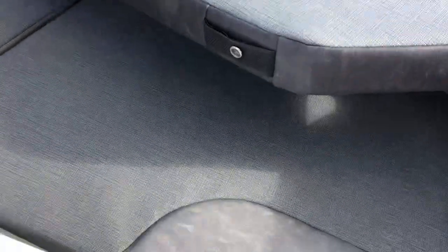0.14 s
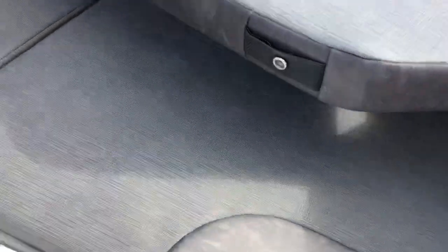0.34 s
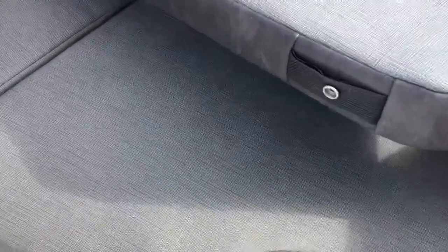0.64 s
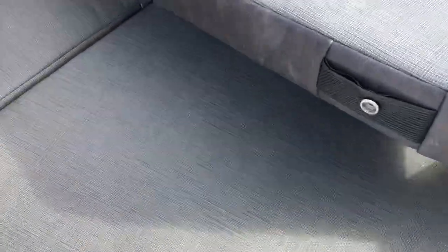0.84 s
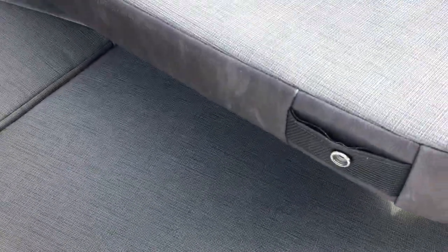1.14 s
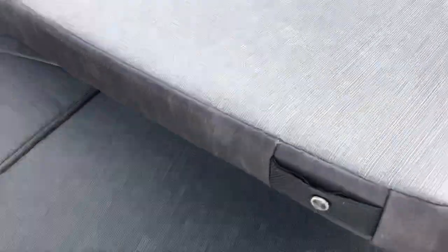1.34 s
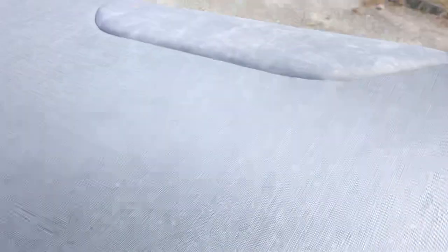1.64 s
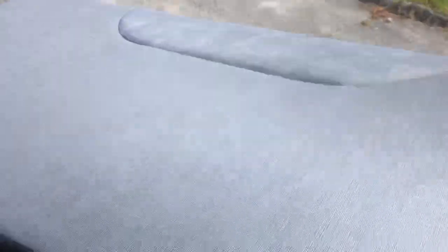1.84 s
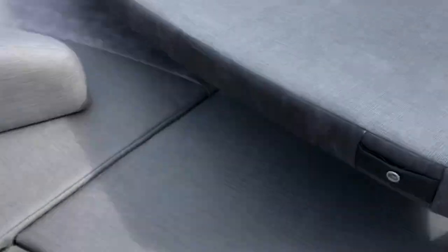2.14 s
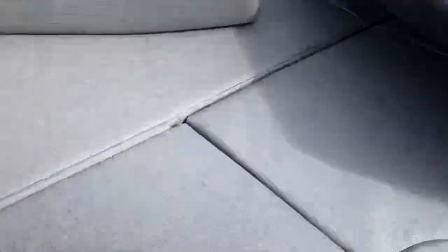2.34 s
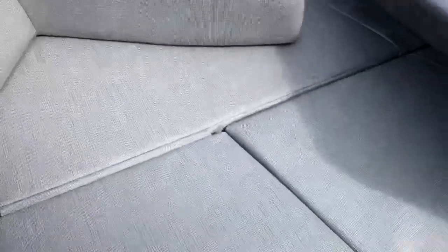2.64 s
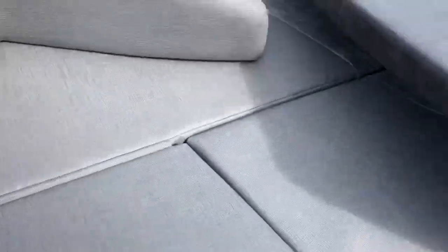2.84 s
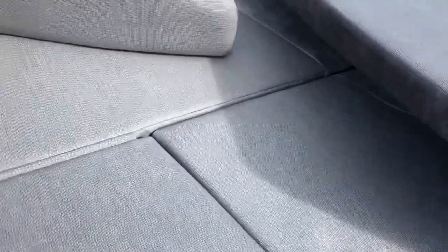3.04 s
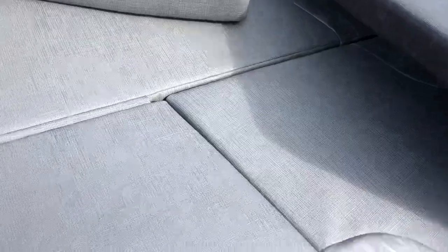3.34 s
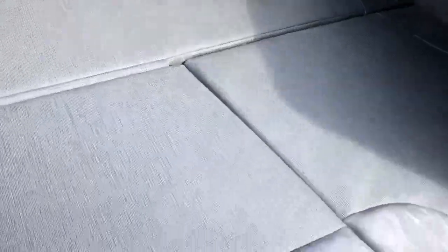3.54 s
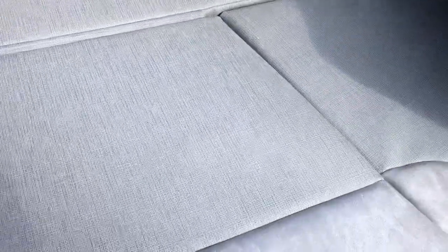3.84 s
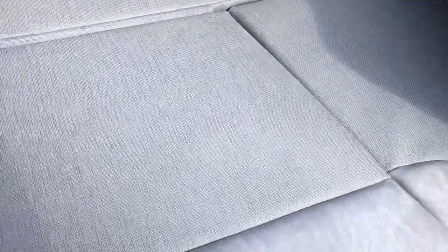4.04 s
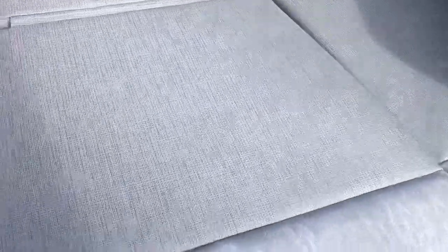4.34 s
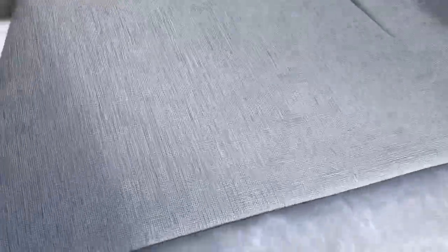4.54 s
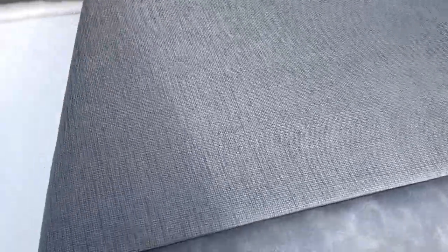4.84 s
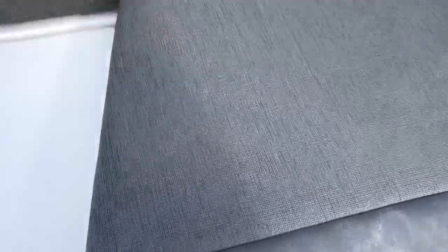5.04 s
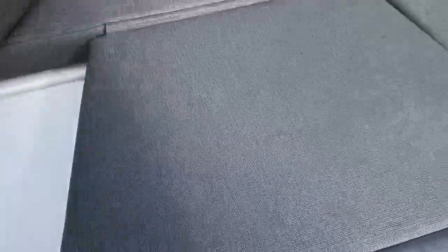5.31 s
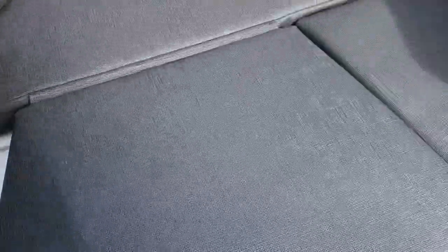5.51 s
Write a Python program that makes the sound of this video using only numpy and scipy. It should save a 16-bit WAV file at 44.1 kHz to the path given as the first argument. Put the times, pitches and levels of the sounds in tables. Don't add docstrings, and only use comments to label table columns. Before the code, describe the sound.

Padded boat hatch handled outdoors: clicks, bouncing low thuds, one loud latch snap, soft cloth rustle, dull steps and a short locker rattle.

```python
import sys
import numpy as np
from scipy import signal
from scipy.fft import rfft, irfft, next_fast_len
from scipy.io import wavfile
from scipy.ndimage import uniform_filter1d, map_coordinates

SR = 44100
rng = np.random.default_rng(int(sys.argv[2]) if len(sys.argv) > 2 else 0)


def pcm_store(signal):
    levels = np.round(np.clip(np.atleast_2d(signal), -1, 1) * 32767)
    wavfile.write(sys.argv[1], SR, levels.astype(np.int16).T)


def gain_from_db(level_db):
    decades = np.asarray(level_db, float) / 20
    return 10 ** decades


N = 250091

# t/s, blow level/dB, extra level of the upper tones/dB
LID_BOUNCES = [
    (.518, -19.5, 0),
    (.624, -23.5, -5),
    (.711, -32, -3),
    (0.788, -30.5, -10.5),
    (.865, -42, -6.5),
]
# f/Hz, level/dB, time to die 60 dB/s
LID_TONES = [(60, -11, 0.97), (70.6, 1, 0.45), (121.8, 6.5, 0.12), (162.4, -7.5, 0.2), (238, -14.5, 0.21),
             (348, -18.5, 0.1), (495, -29, 0.095), (655, -24, 0.13), (872, -33, 0.26), (1176, -20.5, 0.031)]
# centre f/Hz, width/octaves, level over the blow/dB, rise/s, t60/s
LID_AIR = [
    (5500, 0.91, -21.5, 0.00064, .12),
    (935, 1.18, -23.5, .001, 0.21),
    (427, 0.72, -20, 0.0015, 0.23),
]
AIR_GROWS = 0.18

# t/s, peak level/dB, ring f/Hz, t60/s, body level/dB
CATCH_SNAPS = [(.3263, -21.5, 7460, .0018, -24), (.32637, -19.5, 4770, 0.0013, -37),
               (0.3333, -37, 3480, .004, -12), (.341, -45, 2800, .004, -12),
               (0.3474, -21, 6130, 0.00039, -31), (.348, -29.5, 3230, .0021, -12),
               (1.6456, -24, 11800, .004, -11), (1.6457, -28, 7500, .004, -12),
               (1.64758, -4, 9570, .0028, -14), (1.6476, -11, 11700, .002, -24),
               (1.64762, -11, 6500, .0015, -24), (1.648, -26, 13400, .003, -12),
               (1.6481, -25.5, 5380, .004, -12), (1.6509, -20, 8000, .0013, -12),
               (1.6509, -24, 3364, .004, -13), (1.8661, -15, 9150, .0014, -15)]
# f/Hz, t60/s
CATCH_TONES = [(2420, 0.0041), (4700, 0.0014)]
KNOCK_DB = -7
# t/s, peak level/dB, ring f/Hz
CHATTER = [(1.6537, -39.5, 11500), (1.6563, -37, 9500), (1.661, -38, 10060), (1.668, -43, 8000),
           (1.6698, -40, 11000), (1.674, -38.5, 9430), (1.684, -49, 3500), (1.689, -52, 4800)]
# t/s, peak level/dB, ring f/Hz
TICKS = [(2.692, -56, 7900), (4.938, -54, 7440), (5.163, -58, 9530), (5.279, -57.5, 11000),
         (5.336, -48, 7400), (5.528, -50, 3870)]
# t/s, peak level/dB, ring f/Hz
FIBRE_SNAPS = [(.947, -51, 10400), (1.053, -53, 9500), (1.069, -54, 8500), (1.109, -53, 5500),
               (1.129, -49, 8000), (1.269, -49, 10500), (1.541, -56, 5000), (1.988, -52, 11500),
               (.3651, -52, 2800), (4.878, -54, 9500), (5.162, -55, 7470), (5.279, -53, 9500),
               (5.337, -52, 2500), (5.44, -56, 10030)]
CHATTER_T60, TICK_T60, FIBRE_T60 = .0016, 0.0045, 0.0011
SMALL_BODY_DB = -17

# t/s, level/dB, rise/s, t60/s
CUSHION_HITS = [
    (1.843, -40, 0.0012, .1),
    (1.85, -51, .002, .06),
    (1.898, -54, .003, 0.17),
    (1.8663, -24, 0.00026, 0.031),
    (1.8675, -31, 0.0011, 0.095),
]
# f/Hz, width/Hz, level/dB
CUSHION_PEAKS = [(1200, 750, -12), (2550, 680, -3), (5760, 740, -1.5), (7300, 1500, 1.5), (8700, 900, -0.5),
                 (10100, 1500, -2.5), (12800, 800, -17)]
# t/s, level/dB, rise/s, t60/s
LOCKER_HITS = [
    (4.513, -46.5, 0.00073, 0.044),
    (4.526, -53, 0.0039, 0.12),
    (4.5955, -33, 0.00052, 0.067),
    (4.609, -39.5, 0.001, 0.06),
    (4.62, -46, 0.0035, 0.079),
    (4.636, -44, 0.00074, 0.035),
    (4.646, -47, 0.0027, 0.077),
    (4.654, -47.5, .001, 0.035),
]
# f/Hz, width/Hz, level/dB
LOCKER_PEAKS = [(385, 70, 4.5), (580, 99, 0), (772, 82, 4), (1076, 72, -3), (1390, 190, -4.5),
                (2150, 950, -16)]

# t/s, peak level/dB, f/Hz,
# rise/s, t60/s
DECK_THUMPS = [(0.319, -39.5, 50, 0.0067, 0.085), (0.324, -42.5, 149, 0.0019, 0.087),
               (1.898, -45.5, 173, 0.0026, 0.26), (1.98, -45.5, 60, 0.013, 0.31),
               (3.39, -43.5, 60, .01, 0.23), (3.434, -40.5, 80, 0.0024, 0.087),
               (1.662, -35.5, 27.4, 0.0039, 0.068), (1.6472, -30, 330, .0003, .008),
               (1.8652, -27, 300, .0004, .012), (1.8374, -20.5, 198, 0.00065, 0.032),
               (1.837, -30.5, 58, .01, 0.2), (1.879, -35, 50.5, .006, 0.18),
               (1.867, -34, 92.5, 0.0042, 0.15), (2.031, -36, 242, 0.00091, 0.014),
               (3.335, -41, 324.5, 0.00081, 0.014), (3.354, -27, 52.3, 0.025, 0.052),
               (4.312, -22, 54.16, 0.0095, 0.072), (4.792, -51, 90, 0.0033, 0.065)]

# t/s, level/dB, centre f/Hz, t60/s
SPITS = [(.327, -47, 5500, .05), (.624, -47, 4000, .02), (4.93, -61, 900, .12), (1.647, -30, 3800, .014),
         (1.66, -60.5, 7660, .15), (1.837, -40, 8250, 0.12), (1.842, -35, 4920, 0.14),
         (2.03, -66, 7000, .08), (2.094, -61, 3466, 0.11), (4.312, -52.5, 5000, 0.059),
         (4.542, -57.5, 1800, 0.065), (4.5952, -37.5, 4100, .039), (4.601, -50.5, 4030, 0.23)]
# t/s, level/dB, centre f/Hz, t60/s
PATS = [(0.326, -51, 400, 0.21), (1.645, -39, 199, 0.045), (1.6455, -37, 1200, .018),
        (1.838, -34.5, 580, 0.076), (1.866, -39, 345, 0.057), (1.9, -59, 179, .27), (2.031, -56, 550, .04),
        (3.3345, -50, 450, .045), (4.313, -46.5, 513, 0.076), (5.333, -50, 290, .071),
        (5.332, -52, 1000, .027), (5.527, -51.5, 460, .066)]
# t/s, level/dB, centre f/Hz, t60/s
PINGS = [(4.513, -49, 1260, 0.039), (4.635, -55, 11400, .03), (4.653, -47, 1370, .03),
         (4.543, -59, 1850, .04), (5.333, -54, 1670, 0.053)]
# t/s, level/dB, centre f/Hz, t60/s
SCUFFS = [(2.0, -63, 975, .41), (3.3, -56, 174.4, 0.25), (5.3, -67, 2100, .095), (5.58, -69, 3970, 0.22)]
# t/s, level/dB, centre f/Hz, t60/s
WHISTLES = [(4.98, -73, 10400, .12), (5.03, -69, 10300, .12), (5.51, -70, 9900, .07),
            (5.535, -76, 10000, .15), (5.58, -72, 9100, .25)]
PUFF_KINDS = [
    (.9, 0.019),
    (.9, .016),
    (0.17, 0.022),
    (0.67, 0.092),
    (.04, 0.052),
]

# peak t/s, level/dB, build-up/s, fade/s
CLOTH_STROKES = [(.92, -63, .07, 0.055), (1.04, -65, .06, 0.065), (1.14, -68, .04, .04),
                 (1.275, -68, 0.017, .1), (1.5, -67.5, 0.087, .08), (1.6, -70, 0.063, .1),
                 (5.13, -71, 0.056, .06), (1.766, -62, 0.16, 0.14), (2.05, -69.5, .15, .03),
                 (2.1, -73.5, .012, .2), (2.692, -75.5, .01, .2), (3.186, -73.5, .055, 0.088),
                 (3.325, -66, .11, .13), (4.581, -59, .13, 0.028), (5.038, -60, 0.085, 0.12),
                 (5.438, -68.5, .09, .03), (5.6, -71, .2, 0.13)]
STROKE_DB = 18.5
# f/Hz, level/dB
CLOTH_COLOUR = [(2500, -29.5), (5000, -14), (8000, -5), (10500, -4), (12500, -7.5), (15000, -23.5)]
# f/Hz, level/dB
MICROPHONE = [(10, 3.5), (11000, -1.5), (13500, -6), (16000, -26), (20000, -62)]

# t/s, wind level/dB, traffic level/dB
OUTDOOR_LEVELS = [(0, -59, -65), (1, -58.5, -65.5), (1.5, -58, -65), (2.3, -57.5, -65), (2.8, -57.5, -63),
                  (3.2, -58.5, -63.5), (4, -57.5, -63), (4.8, -54.5, -63), (5.3, -58.5, -63),
                  (5.67, -55.5, -60.5)]
# f/Hz, level/dB
WIND_COLOUR = [(4.7, -25.5), (8.0, -4), (16, -8), (22, -11), (78, -12), (104, -15), (300, -36),
               (390, -55.5), (660, -120)]
# f/Hz, level/dB
TRAFFIC_COLOUR = [(120, -24.5), (200, -6), (382, -6.5), (410, -8), (446, -4.5), (497, -7.5), (631, -4),
                  (1120, -7.5), (2070, -21), (3500, -30), (4550, -58.5), (7700, -120)]
# f/Hz, level/dB
HISS_COLOUR = [(1400, -29), (2500, -4.5), (4000, -3.5), (8000, -6), (14000, -8.5), (15700, -8),
               (15800, -72.5), (17000, -120)]
HISS_DB = -71.5
OFFSET = .0075


def lid():
    out = np.zeros(N)
    t = np.arange(SR) / SR
    for s, blow_db, upper_db in LID_BOUNCES:
        for hz, tone_db, t60 in LID_TONES:
            level = gain_from_db(blow_db + tone_db + upper_db * (hz > 100))
            add(out, s, -level * swell(t, 0.0022, t60) * tone(hz, t))
    return out


def lid_air():
    out = np.zeros(N)
    for s, db, upper_db in LID_BOUNCES:
        blow_db = db + upper_db
        for centre_hz, width, air_db, rise, t60 in LID_AIR:
            extra_db = AIR_GROWS * (blow_db + 28) * (centre_hz > 3000)
            add_puff(out, s, blow_db + air_db + extra_db, centre_hz, width, rise, t60)
    return out


def catch():
    out = np.zeros(N)
    t = np.arange(SR // 50) / SR
    clicks = list(CATCH_SNAPS)
    for rows, t60 in ((CHATTER, CHATTER_T60), (TICKS, TICK_T60), (FIBRE_SNAPS, FIBRE_T60)):
        clicks += [(*row, t60, SMALL_BODY_DB) for row in rows]

    low = sum(swell(t, .0001, t60) * tone(hz, t) for hz, t60 in CATCH_TONES)
    knock = swell(t, 0.0002993, 0.0023) * np.cos(2 * np.pi * 800 * t)
    body = low + gain_from_db(KNOCK_DB) * knock
    for s, db, ring_hz, ring_t60, body_db in clicks:
        ring = swell(t, .00006, ring_t60) * tone(ring_hz, t)
        add(out, s, gain_from_db(db) * (ring + gain_from_db(body_db) * body))
    return out


def cushion():
    return panel(CUSHION_HITS, CUSHION_PEAKS)


def locker():
    return panel(LOCKER_HITS, LOCKER_PEAKS)


def panel(hits, peaks):
    drive = np.zeros(N)
    t = np.arange(SR // 3) / SR
    for s, db, rise, t60 in hits:
        add(drive, s, gain_from_db(db) * swell(t, rise, t60) * unit(grit(len(t))))

    f = np.fft.rfftfreq(N, 1 / SR)
    body = 0
    for k, (hz, width, db) in enumerate(peaks):
        resonance = 1j * f * width / (hz * hz - f * f + 1j * f * width)
        body = body + (-1) ** k * gain_from_db(db) * resonance
    return irfft(rfft(drive) * body / np.sqrt(np.mean(abs(body) ** 2)), N)


def deck():
    out = np.zeros(N)
    t = np.arange(SR // 2) / SR
    for s, db, hz, rise, t60 in DECK_THUMPS:
        add(out, s, -gain_from_db(db) * swell(t, rise, t60) * tone(hz, t))
    return out


def contacts():
    out = np.zeros(N)
    kinds = (SPITS, PATS, PINGS, SCUFFS, WHISTLES)
    for rows, (width, rise_share) in zip(kinds, PUFF_KINDS):
        for s, db, centre_hz, t60 in rows:
            add_puff(out, s, db, centre_hz, width, rise_share * t60, t60)
    return out


def add_puff(track, s, db, centre_hz, width, rise, t60):
    t = np.arange(SR // 3) / SR
    hz = np.fft.rfftfreq(len(t), 1 / SR) + 1
    response = np.exp(-.5 * (np.log2(hz / centre_hz) / width) ** 2)
    band = unit(irfft(rfft(grit(len(t))) * response, len(t)))
    add(track, s, gain_from_db(db) * swell(t, rise, t60) * band)


def cloth():
    t = np.arange(N) / SR
    level = np.zeros(N)
    for s, db, build, fade in CLOTH_STROKES:
        distance = np.maximum((s - t) / build, (t - s) / fade)
        level += gain_from_db(db - STROKE_DB * distance)
    clumps_db = 2.2 * rng.exponential(size=N) + 2.6 * wobble(70)
    grains = rng.standard_normal(N) * gain_from_db(clumps_db)
    return level * coloured(grains, CLOTH_COLOUR)


def outdoors():
    wind_db, traffic_db = curves(OUTDOOR_LEVELS)
    rumble = coloured(rng.standard_normal(N), WIND_COLOUR)
    wind = unit(gain_from_db(1.2 * wobble(12)) * rumble)

    z = signal.stft(rng.standard_normal(N), nperseg=1024)[2]
    patches = uniform_filter1d(rng.standard_normal(z.shape), size=8, axis=0)
    patches = uniform_filter1d(patches, size=12, axis=1)
    drifting = signal.istft(z * gain_from_db(1.1 * unit(patches)), nperseg=1024)[1][:N]
    traffic = coloured(drifting, TRAFFIC_COLOUR)

    hiss = coloured(rng.standard_normal(N), HISS_COLOUR)
    return gain_from_db(wind_db + 4.5) * wind + gain_from_db(traffic_db + 3.5) * traffic + gain_from_db(HISS_DB) * hiss


def tone(hz, t):
    return np.sin(2 * np.pi * hz * t)


def swell(t, rise, t60):
    shape = (1 - np.exp(-t / rise)) ** 2 * gain_from_db(-60 * t / t60)
    return shape / shape.max()


def add(track, s, sound):
    part = track[round(s * SR):][:len(sound)]
    part += sound[:len(part)]


def grit(size):
    clumps = unit(uniform_filter1d(rng.standard_normal(size), size=60))
    return rng.standard_normal(size) * gain_from_db(1.4 * clumps)


def unit(x):
    return x / np.sqrt(np.mean(x ** 2) + 1e-20)


def curves(rows):
    s, *columns = np.transpose(rows)
    return [np.interp(np.arange(N) / SR, s, column) for column in columns]


def wobble(rate):
    knots = rng.standard_normal(int(N * rate / SR) + 4)
    return map_coordinates(knots, [np.arange(N) * rate / SR])


def shaped(x, spectrum):
    hz, db = np.transpose(spectrum)
    m = next_fast_len(len(x) + 8192)
    f = np.fft.rfftfreq(m, 1 / SR)
    gain = gain_from_db(np.interp(np.log(f + 1), np.log(hz + 1), db))
    return irfft(rfft(x, m) * gain, m)[:len(x)]


def coloured(x, spectrum):
    return unit(shaped(x, spectrum))


def scene():
    handling = lid() + lid_air() + catch() + cushion() + locker() + deck() + contacts() + cloth()
    return (shaped(handling, MICROPHONE) + outdoors())[None]


def top_cut(x):
    return signal.sosfilt(signal.butter(12, 16860, fs=SR, output="sos"), x)


def record(dry):
    return top_cut(dry + OFFSET)


dry = scene()
out = record(dry)
pcm_store(out)
```